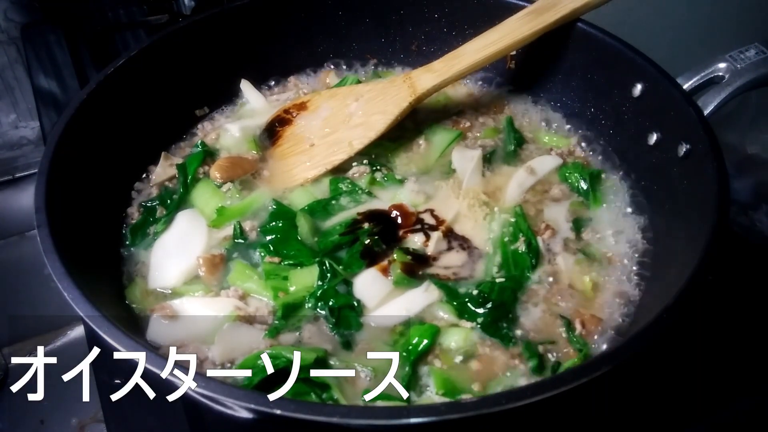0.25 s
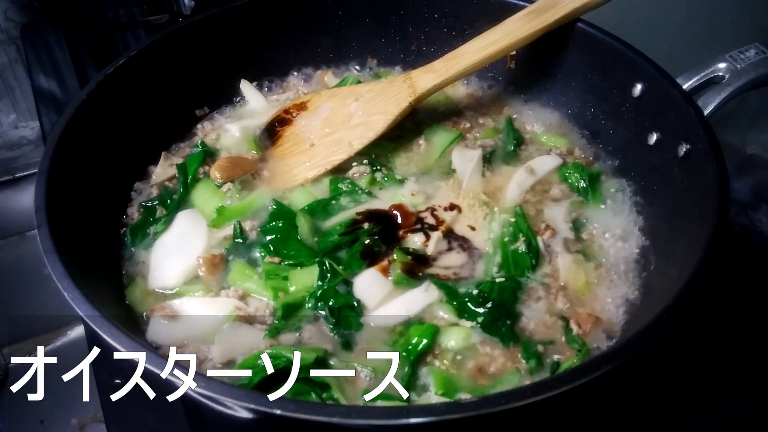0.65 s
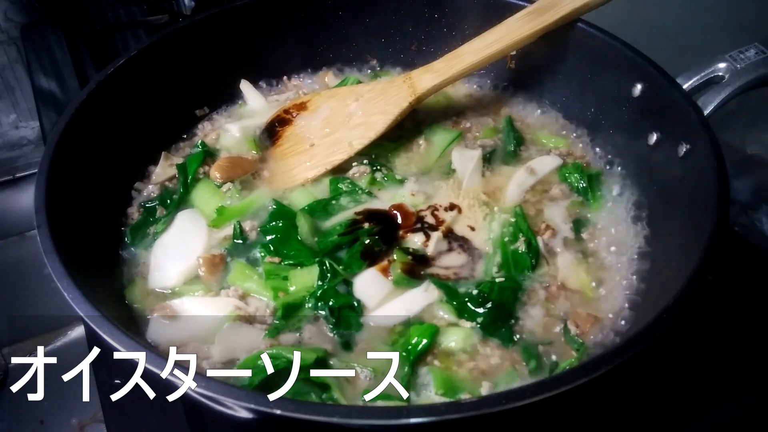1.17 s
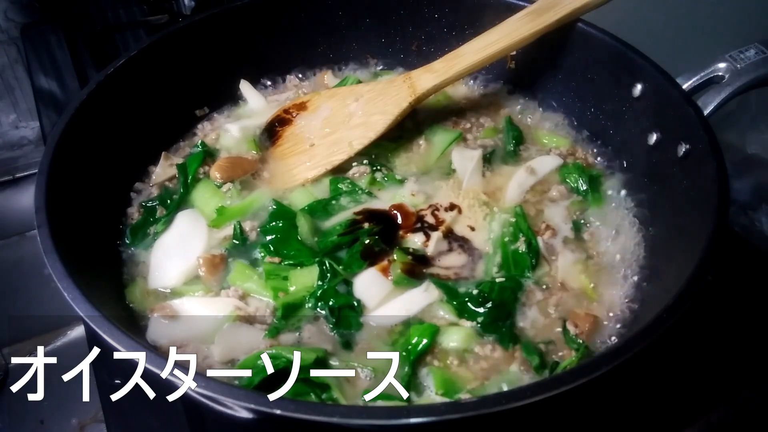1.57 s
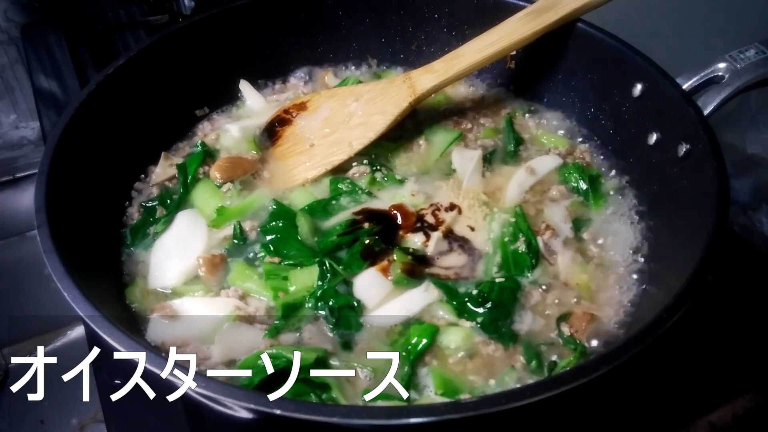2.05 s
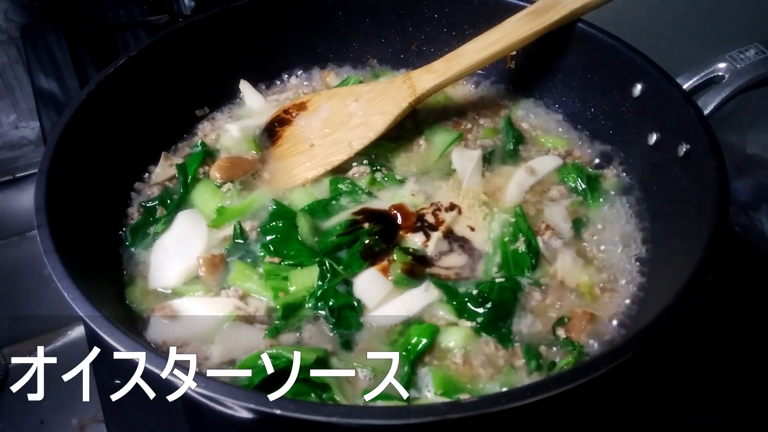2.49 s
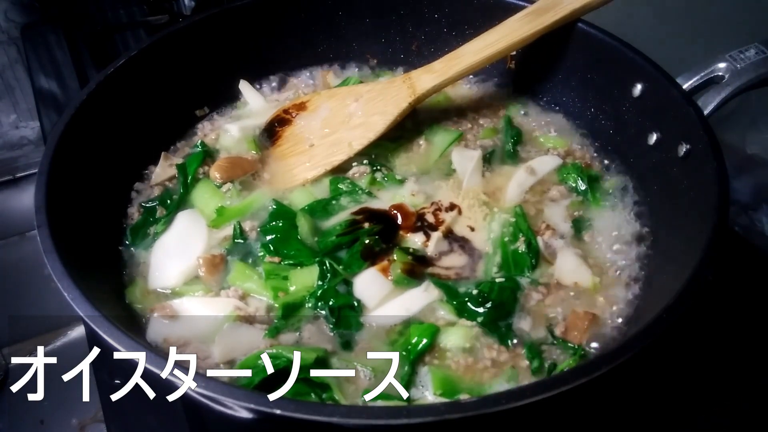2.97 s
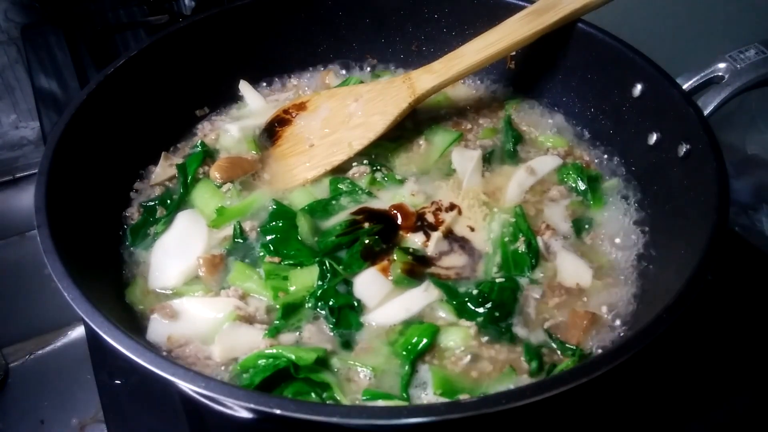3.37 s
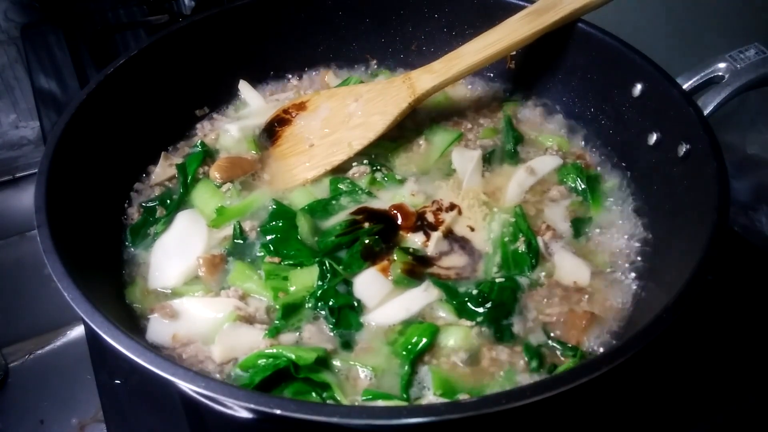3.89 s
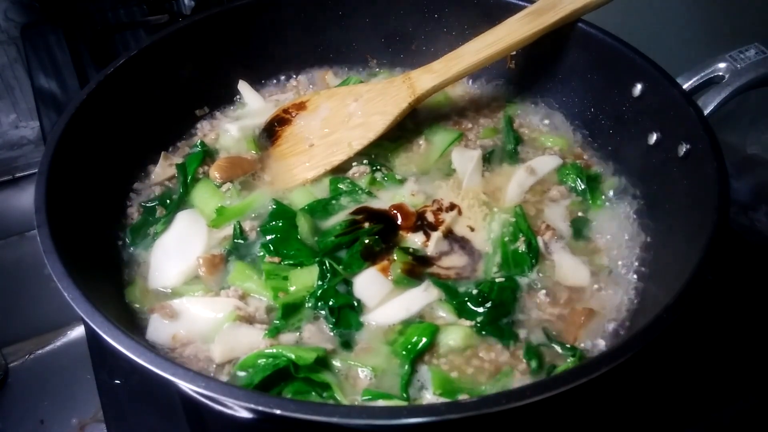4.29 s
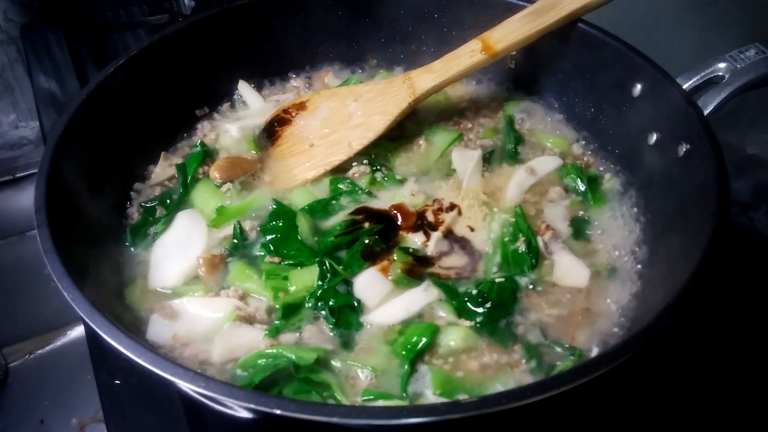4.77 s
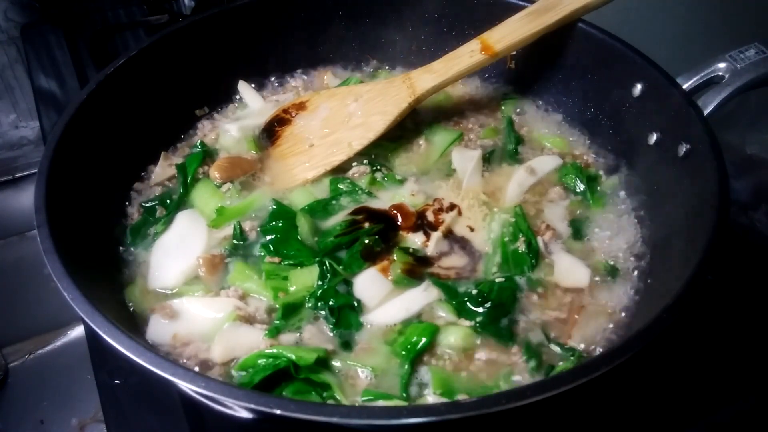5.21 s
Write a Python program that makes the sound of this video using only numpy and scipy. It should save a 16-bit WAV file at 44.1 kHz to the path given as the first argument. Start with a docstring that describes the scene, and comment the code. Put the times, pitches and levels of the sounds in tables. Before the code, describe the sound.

A pan of broth, greens and meat simmers close to the microphone, bright fizz at the rim over soft bubbling and a low stove rumble. A plastic snap comes just after one second, then around two and again near 2.8 seconds something is set down with loud, rattling thumps. A sharp click follows at about 3.5 seconds, then mostly simmering in a small, lively kitchen.

```python
"""Broth with greens and meat simmers in a frying pan, fizzing at the hot rim and bubbling in the middle.
Tiny bursts make the fizz, ringing steam bubbles the broth; under both, a stove rumbles and hums as tones.
Beside the pan a sauce bottle is handled: its cap snaps in filtered bursts, it scuffs as gritty noise,
and it is set down and judders on the counter, which rings in decaying modes; something heavy thuds.
A small kitchen answers in noise tails; the microphone's limiter holds the loudest blows down."""
import sys
import numpy as np
from scipy import signal
from scipy.fft import rfft, irfft, next_fast_len
from scipy.io import wavfile
from scipy.ndimage import uniform_filter1d, minimum_filter1d, map_coordinates

SR = 44100
rng = np.random.default_rng(int(sys.argv[2]) if len(sys.argv) > 2 else 0)


def wav_out(sig):
    """Save sig, one row per channel (or a flat mono array), as 16-bit PCM at SR to the path in sys.argv[1]."""
    wavfile.write(sys.argv[1], SR, np.round(np.clip(np.atleast_2d(sig).T, -1, 1) * 32767).astype(np.int16))


N = 239992
TIME = np.arange(N) / SR  # seconds into the scene
AGE = TIME[:SR // 2]  # seconds since a short sound began


def amp(db):
    """Decibels to gain."""
    return 10 ** (np.asarray(db) / 20)


def unit(x):
    """Scale to rms 1."""
    return x / np.sqrt(np.mean(x ** 2) + 1e-20)


def along(points, hz):
    """Read (Hz, value) points on a log frequency axis."""
    point_hz, values = np.transpose(points)
    return np.interp(np.log(hz + 1), np.log(point_hz), values)


def curve(points):
    """Draw straight lines through (s, value) points, one value per sample."""
    s, values = np.transpose(points)
    return np.interp(TIME, s, values)


def wobble(rate):
    """A smooth random curve with rate knots a second."""
    knots = rng.standard_normal(int(N * rate / SR) + 4)
    return map_coordinates(knots, [TIME * rate])


def add(track, s, sound):
    """Mix a sound into the track at time s."""
    part = track[max(round(s * SR), 0):][:len(sound)]
    part += sound[:len(part)]


def coloured(x, spectrum, tilt_db=0):
    """Causal minimum-phase filter of unit power with the given spectrum, tilted per octave."""
    m = 2 * next_fast_len(len(x) // 2 + 2048)
    hz = np.fft.rfftfreq(m, 1 / SR)
    gain = unit(amp(along(spectrum, hz) + tilt_db * np.log2(hz + 20)))
    # folding the cepstrum onto positive times makes the filter causal
    cepstrum = irfft(np.log(np.maximum(gain, 1e-6)))
    cepstrum[1:m // 2] *= 2
    cepstrum[m // 2 + 1:] = 0
    response = np.exp(rfft(cepstrum))
    return irfft(rfft(x, m) * response)[:len(x)]


def fade(t, t60):
    """A decay of 60 dB in t60 seconds."""
    return np.exp(-np.log(1000) * t / t60)


def puff(t60):
    """White noise that starts at once and dies away."""
    return rng.standard_normal(len(AGE)) * fade(AGE, t60)


# The small kitchen's reverberation. Columns: frequency_hz, t60_s
ROOM_DECAY = [(100, 0.27), (500, 0.53), (2000, 0.57), (8000, 0.54), (16000, 0.46)]


def kitchen(x, near_db, far_db, near_t60):
    """Add the quick answer of nearby surfaces and the room's longer tail, each as decaying noise."""
    hz, t, noise = signal.stft(rng.standard_normal(len(AGE)), SR, nperseg=256)
    decay = fade(t, along(ROOM_DECAY, hz)[:, None])
    far = signal.istft(noise * decay, SR, nperseg=256)[1][:len(AGE)]
    near = puff(near_t60) * (1 - np.exp(-AGE / 0.0023))
    near = amp(near_db) * near / np.linalg.norm(near)
    far = amp(far_db) * far / np.linalg.norm(far)
    return x + signal.fftconvolve(x, near + far)[:len(x)]


def crack(t60):
    """A brief contact that builds, lets go and excites all frequencies nearly alike."""
    force = fade(AGE, t60) * (1 - fade(AGE, t60)) ** 2
    burst = force * rng.standard_normal(len(AGE))
    # keeping only the phases flattens the spectrum
    even = irfft(np.exp(1j * np.angle(rfft(burst))), len(AGE)) * np.sqrt(force)
    return even * np.linalg.norm(fade(AGE, t60)) / np.linalg.norm(even)


# Swells of the stove's hum. Columns: start_s, hold_s, level_db
HUM_TIMES = [(0, 0.043, -42), (0.535, 0.64, -40.5), (3.616, 0.63, -46.5), (4.945, 0.29, -36)]
HUM_FADE_DB_PER_S = 49  # on both sides of a swell


def hum_level():
    """The hum rises, holds and falls away at a steady rate in dB."""
    start, hold, level_db = np.transpose(HUM_TIMES)[:, :, None]
    away_s = np.abs(TIME - np.clip(TIME, start, start + hold))
    return np.max(level_db - HUM_FADE_DB_PER_S * away_s, axis=0)


# Harmonics of the hum. Columns: multiple of the hum's pitch, relative level_db
HUM_HARMONICS = [(1, 0.5), (2, -12), (3, -17), (4, -19.5)]
# Spectrum of the stove's rumble, also of the boom under a blow. Columns: frequency_hz, relative level_db
RUMBLE_SPECTRUM = [(15, -2.5), (25, -1.5), (46, -9), (63, -7), (108, -2), (167, -9.5), (188, -10),
                   (261, -9.5), (317, -18.5), (380, -11), (450, -39), (580, -48), (990, -120)]
HUM_HZ = 64.7
RUMBLE_DB, RUMBLE_GROWS = -46, 1.57  # level at an average boil; its dB for each dB of boiling


def stove(boil_db):
    """The stove rumbles more the harder the pan boils, and hums with a slightly unsteady pitch."""
    rumble_db = RUMBLE_DB + RUMBLE_GROWS * (boil_db - boil_db.mean())
    rumble = unit(coloured(rng.standard_normal(N), RUMBLE_SPECTRUM))
    rumble = rumble * amp(rumble_db + 2.56 * wobble(26))
    pitch_hz = HUM_HZ * (1 + 0.0159 * wobble(12))
    phase = 2 * np.pi * np.cumsum(pitch_hz) / SR
    hum = unit(sum(amp(db) * np.sin(multiple * phase) for multiple, db in HUM_HARMONICS))
    return rumble + hum * amp(hum_level() + 1.6 * wobble(16))


# The bottle slides and is gripped. Columns: start_s, level_db, length_s, centre_hz
SCUFF_TIMES = [(1.239, -43, 0.03, 3200), (1.992, -37.5, 0.099, 2930), (2.465, -52.5, 0.11, 2500),
               (3.112, -46.5, 0.076, 3670), (3.212, -52, 0.086, 2510), (3.968, -42, 0.083, 2730),
               (4.055, -50.5, .12, 2450)]


def scuffs():
    """The bottle rubs against hand and counter: brief strokes of noise with random grit."""
    track = np.zeros(N)
    for s, db, length, centre_hz in SCUFF_TIMES:
        stroke = np.sin(np.pi * np.minimum(AGE / length, 1) ** 0.35)
        grit = rng.standard_normal(len(AGE)) * amp(0.74 * rng.standard_normal(len(AGE)))
        shape = [(centre_hz / 10, -18), (centre_hz / 2, -4), (centre_hz, 0),
                 (centre_hz * 2, -8), (centre_hz * 5, -16)]
        rub = coloured(grit * stroke, shape)
        add(track, s, amp(db) * kitchen(rub, near_db=-13.0, far_db=-19.5, near_t60=0.32))
    return track


# Spectrum of the hard plastic snap. Columns: frequency_hz, relative level_db
SNAP_SPECTRUM = [(400, -16), (1200, -24), (2200, -5), (4000, -7.5), (5500, -1), (6600, 1), (7700, 7),
                 (9000, 1.5), (10700, 6), (12500, -10.5), (14500, -2.5), (16000, -22)]
# Resonances of the hollow bottle. Columns: multiple of the clack's pitch, relative level_db, t60_s
BOTTLE_MODES = [(.6, -8.5, 0.03), (1, 3.5, 0.011), (1.3, 1.5, 0.0056), (1.95, -17.5, 0.02),
                (3.3, -10, 0.009), (4.5, -21, 0.019)]


def plastic(snap_db, bright_db, clack_db, clack_hz, t60, echo_db):
    """Hard plastic snaps as a sharp burst, and the hollow bottle's modes clack with it."""
    snap = amp(snap_db) * coloured(crack(t60), SNAP_SPECTRUM, bright_db)
    clack = np.zeros(len(AGE))
    for multiple, db, life in BOTTLE_MODES:
        tone = np.sin(2 * np.pi * clack_hz * multiple * AGE)
        clack += amp(clack_db + db) * tone * fade(AGE, life)
    clack *= 1 - np.exp(-AGE / 0.0011)
    return kitchen(snap + clack, near_db=echo_db - 4.0, far_db=echo_db - 8.5, near_t60=0.22)


# Hard plastic clicks. Columns: start_s, snap_db, brightness_db_per_octave, clack_db, clack_hz,
# contact_t60_s, echo_db (before the offsets in plastic), second_catch_db (over the first)
CLICK_TIMES = [(1.291, -5, 0, -12.5, 693, 0.0042, -4.5, -40),
               (1.969, -14.5, 4, -13.5, 1890, 0.013, -13, -20),
               (2.115, -24.5, 10, -16, 880, 0.011, -19, -30), (2.153, -29.5, 2, -19.5, 1900, 0.01, -9, -34),
               (2.7554, -18, 6, -23, 1197, 0.0075, -11, 0.5), (3.4129, -22, -2.5, -34, 1220, 0.019, 1, 0),
               (3.4582, -23, -2, -28.5, 1030, 0.019, 1.5, -18), (3.522, -35, -5, -21, 950, .0055, 1.5, -20),
               (3.552, -6, -3, -8.5, 1117, 0.0065, -1, -11)]
CATCH_S, CATCH_PITCH = .0046, 0.801  # the second catch: its delay; its clack's pitch over the first
CATCH_DULLER_DB, CATCH_CLACK_DB = 0.5, 11.5  # its lost brightness per octave; its added clack


def clicks():
    """The plastic catches twice in quick succession: a snap, then a duller and hollower one."""
    track = np.zeros(N)
    for s, snap_db, bright_db, clack_db, clack_hz, t60, echo_db, again_db in CLICK_TIMES:
        add(track, s, plastic(snap_db, bright_db, clack_db, clack_hz, t60, echo_db))
        again = plastic(snap_db, bright_db - CATCH_DULLER_DB, clack_db + CATCH_CLACK_DB,
                        clack_hz * CATCH_PITCH, t60, echo_db)
        add(track, s + CATCH_S, amp(again_db) * again)
    return track


# Modes of the counter with what stands on it.
# Columns: frequency_hz, relative level_db, t60_s (before the shortening at each contact)
COUNTER_MODES = [(66, 10, .16), (92, 9.5, 0.214), (110.5, -2.5, 0.15), (142, -1, 0.185),
                 (182.3, -2.5, 0.41), (209.3, 0, 0.31), (271.4, 4, 0.17), (311.5, 4, 0.22),
                 (366, -9.5, 0.41), (476.7, -9.5, 0.46), (659, -3, 0.13), (952, -12.5, 0.29),
                 (1350, -17, 0.19), (1577, -15, .15), (1900, -3, 0.066)]
# Spectrum of what rattles on the counter. Columns: frequency_hz, relative level_db
RATTLE_SPECTRUM = [(30, -32), (70, -20), (200, 6.5), (400, 1), (600, -11), (1000, -12.5), (2000, -24),
                   (3500, -34.5), (6000, -50), (10000, -39), (16000, -53)]
BOOM_DB, BOOM_T60_S = -17, 0.56  # the cupboard below booms with each contact


def blow(contact_hz, rattle_db, share):
    """One contact rings the counter, a soft one mostly its low modes, shakes what stands on it and booms below."""
    hz, mode_db, t60 = np.transpose(COUNTER_MODES)[:, :, None]
    swing = np.sin(2 * np.pi * hz * AGE) * (1 - np.exp(-AGE / 0.0012))
    # modes far from the contact's own frequency are excited less
    octaves_off = np.abs(np.log2(hz / contact_hz))
    strength = amp(mode_db - 7.1 * octaves_off + 0.93 * rng.standard_normal(hz.shape))
    ring = (strength * swing * fade(AGE, t60 * share)).sum(0) / np.linalg.norm(strength)
    rattle = amp(rattle_db) * coloured(puff(0.21), RATTLE_SPECTRUM)
    boom = amp(BOOM_DB) * coloured(puff(BOOM_T60_S), RUMBLE_SPECTRUM)
    return kitchen(ring + rattle + boom, near_db=-16, far_db=-18, near_t60=.08)


# Things put down on the counter. Columns: start_s, level_db, contact_hz (what the first contact
# excites most), rattle_db, bouncing_s, softening_octaves_per_bounce
THUMP_TIMES = [(1.973, -8.5, 348, -6, .095, 0.96), (2.099, -8, 326, -14.5, .177, 0),
               (2.492, -31.5, 380, -12, .01, 0), (2.762, -12, 354, -10.5, .01, 0),
               (2.773, -8.5, 112, -21, .04, 0.12), (3.221, -34.5, 300, -3.5, .01, 0),
               (3.298, -29, 274, -14, .04, 0), (4.059, -27, 380, -8.5, .01, 0)]
BOUNCE_S, BOUNCE_SCATTER_S = .028, .0002  # from one contact to the next; its random spread
BOUNCE_LOSS_DB, SOFT_LOSS_DB = 0.69, 1.5  # level lost per bounce, and per octave of softening
HELD_RING, LAST_RING = 0.63, 0.855  # share of the ringing time left between bounces, and after the last
TICK_DB, TICK_CLACK_DB, TICK_T60_S = -11.5, -7, 0.015  # bottle's snap and clack on a rebound, over the rattle


def thumps():
    """Things put down bounce at a nearly even pace, ever weaker; the bottle ticks on the rebounds."""
    track = np.zeros(N)
    for start, level_db, contact_hz, rattle_db, length, softening in THUMP_TIMES:
        last = int(length / BOUNCE_S)
        for k in range(last + 1):
            s = start + k * BOUNCE_S + BOUNCE_SCATTER_S * rng.standard_normal()
            db = level_db - k * (BOUNCE_LOSS_DB + SOFT_LOSS_DB * softening)
            softened_hz = contact_hz / 2 ** (k * softening)
            share = LAST_RING if k == last else HELD_RING
            add(track, s, amp(db) * blow(softened_hz, rattle_db, share))
            if k:
                tick = plastic(TICK_DB, bright_db=2, clack_db=TICK_CLACK_DB, clack_hz=970,
                               t60=TICK_T60_S, echo_db=4.5)
                add(track, s, amp(db + rattle_db) * tick)
    return track


def bubble(t, hz, cycles, rise):
    """A bubble rings for some cycles, its pitch rising as it reaches the surface."""
    life = np.minimum(t * hz / cycles, 2)
    ring = np.sin(2 * np.pi * cycles * life * (1 + rise * life / 2))
    return ring * fade(life, 0.64) * (1 - np.exp(-2 * t * hz))


# How hard the broth boils. Columns: time_s, level_db (before a fixed lift in bubbling)
BOIL_LEVEL = [(0, -47), (.75, -49), (1.21, -46), (1.4, -51.5), (1.8, -52), (2.5, -51), (3.3, -51),
              (3.8, -52), (4.15, -49.5), (4.35, -51.5), (5.44, -51.5)]
# Spectrum of the bubbling broth. Columns: frequency_hz, relative level_db
BROTH_SPECTRUM = [(120, -24), (250, 2), (370, -9.5), (470, -6.5), (620, -9), (920, -8.5), (1130, -13.5),
                  (1420, -18.5), (1750, -14.5), (2100, -20), (2600, -19.5), (3500, -28.5), (5000, -25.5),
                  (8000, -61)]
# Large bubbles that burst. Columns: start_s, level_db (before a fixed cut), pitch_hz (at the start)
PLOP_TIMES = [(.309, -26, 835), (.574, -23.5, 1020), (.941, -25, 900), (1.511, -29.5, 920),
              (3.042, -28, 590), (3.12, -24, 845), (4.131, -23.5, 2230), (4.476, -25, 840)]


def bubbling(level_db):
    """Steam bubbles ring as they break through the broth, over a noise wash of smaller ones."""
    t = AGE[:SR // 15]
    draws = rng.random((int(340 * N / SR), 3))  # 340 bubbles a second
    hz = 260 * (3000 / 260) ** draws[:, 1:2]
    size = amp(3.24 * np.minimum(-np.log(1 - draws[:, 2:]), 3.6)) * hz
    where = (draws[:, :1] * N).astype(int) + np.arange(len(t))
    rings = size * bubble(t, hz, cycles=30, rise=.12)
    grains = np.bincount(where.ravel(), rings.ravel(), N)[:N]
    grains = kitchen(grains, near_db=0.5, far_db=-4, near_t60=0.22)
    grains = unit(coloured(grains, BROTH_SPECTRUM))
    wash = unit(coloured(rng.standard_normal(N), BROTH_SPECTRUM)) * amp(1.5 * wobble(25))
    broth = unit(grains + amp(-3.5) * wash) * amp(level_db + 1.5)
    for s, db, pitch_hz in PLOP_TIMES:
        plop = bubble(AGE, pitch_hz, cycles=17, rise=.12)
        add(broth, s, amp(db - 6.5) * kitchen(plop, near_db=-4, far_db=3, near_t60=.07))
    return broth


def pops(rate, spread_db):
    """Random impulses, rate a second, mostly small and a few large."""
    draws = rng.random((int(rate * N / SR), 3))
    sign = np.sign(draws[:, 2] - .5)
    size = amp(spread_db * np.minimum(-np.log(1 - draws[:, 1]), 6)) * sign
    return unit(np.bincount((draws[:, 0] * N).astype(int), size, N))


# Fizz at the hot rim. Columns: time_s, level_db (before a fixed lift in fizz)
RIM_LEVEL = [(0, -51.5), (.15, -47.5), (.5, -44.5), (1.35, -44), (1.83, -45.5), (2.05, -44.5), (2.7, -46.5),
             (3.15, -42), (3.7, -44), (4.3, -48.5), (4.78, -49), (4.89, -44.5), (5.1, -51), (5.44, -50)]
# Spectrum of the fizz and of the spitting drops. Columns: frequency_hz, relative level_db
FIZZ_SPECTRUM = [(1760, -51), (3000, -14), (3430, -15), (4140, -21.5), (4570, -16), (4970, -19),
                 (5560, -11.5), (6300, -11.5), (7200, 0), (7560, 3), (8520, -2.5), (10600, 1.5),
                 (12500, -14), (14700, -7.5), (16000, -16.5)]
# Drops that spit on the hot wall. Columns: start_s, level_db (before a fixed cut on the spit)
SPIT_TIMES = [(0.7788, -33), (1.235, -24.5), (2.4648, -25), (3.994, -29.5), (4.132, -25.5), (4.51, -33),
              (4.715, -32)]
FLARE_DB, FLARE_T60_S = -19, 0.73  # each drop sizzles away: level over the table's, dying time


def fizz(level_db):
    """Countless tiny bubbles burst along the hot rim; single drops spit above them and sizzle away."""
    crackle = unit(kitchen(pops(rate=2600, spread_db=3.5), near_db=-12.5, far_db=-24, near_t60=0.018))
    haze = rng.standard_normal(N)
    spray = unit(coloured(haze + amp(-0.5) * crackle, FIZZ_SPECTRUM))
    spray *= amp(level_db + 0.5 + 0.99 * wobble(13) + 1.04 * wobble(120))
    for s, db in SPIT_TIMES:
        spit = kitchen(coloured(crack(.0043), FIZZ_SPECTRUM), near_db=2, far_db=3, near_t60=.045)
        add(spray, s, amp(db - 6) * spit)
        add(spray, s, amp(db + FLARE_DB) * coloured(puff(FLARE_T60_S), FIZZ_SPECTRUM))
    return spray


def scene():
    """The simmering pan on its stove and the handling beside it."""
    boil_db = curve(BOIL_LEVEL)
    handling = scuffs() + clicks() + thumps()
    pan = bubbling(boil_db) + fizz(curve(RIM_LEVEL))
    return (stove(boil_db) + handling + pan)[None]


TOP_HZ = 16100  # band limit


def record(dry):
    """The microphone loses the deepest bass, a fast limiter holds the peaks, and the band is cut off above."""
    sound = signal.sosfilt(signal.butter(6, 35, "highpass", fs=SR, output="sos"), dry)
    ceiling = .36  # of full scale
    needed = np.minimum(1, ceiling / (np.abs(sound) + 1e-9))
    # the lowest gain within about 1 ms either way, then smoothed
    gain = uniform_filter1d(minimum_filter1d(needed, size=89), size=45)
    m = next_fast_len(N + SR // 2)
    kept = np.fft.rfftfreq(m, 1 / SR) < TOP_HZ
    return irfft(rfft(sound * gain, m) * kept, m)[:, :N]


dry = scene()
out = record(dry)
wav_out(out)
```